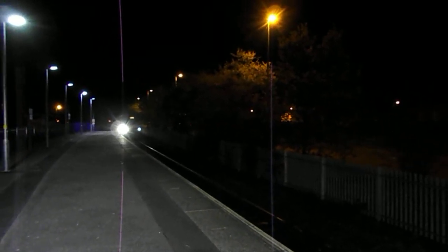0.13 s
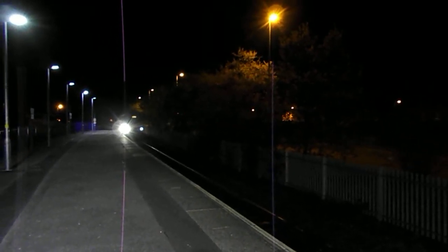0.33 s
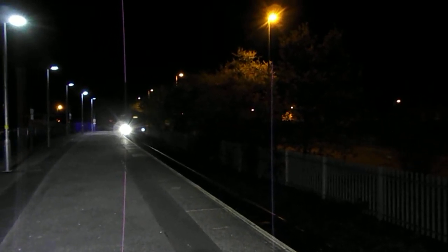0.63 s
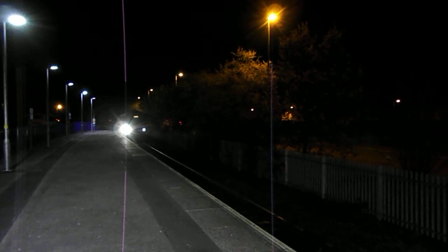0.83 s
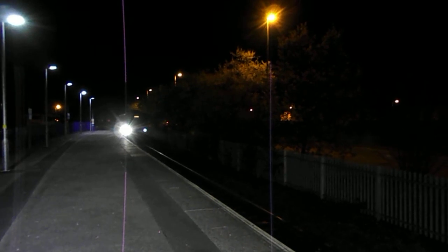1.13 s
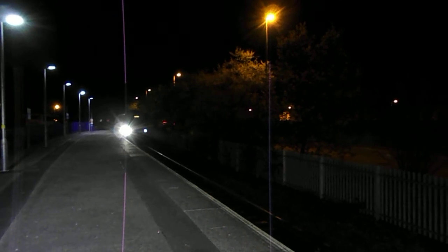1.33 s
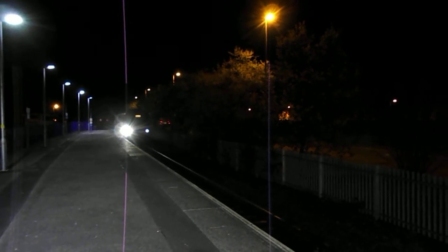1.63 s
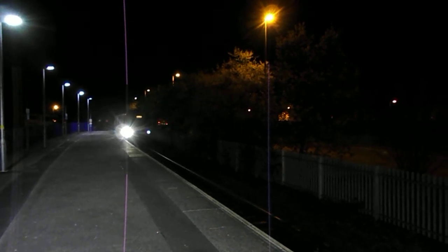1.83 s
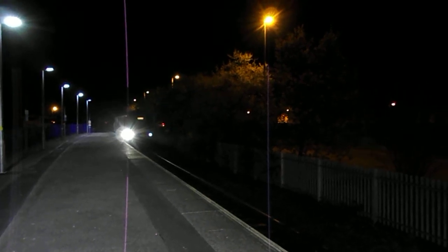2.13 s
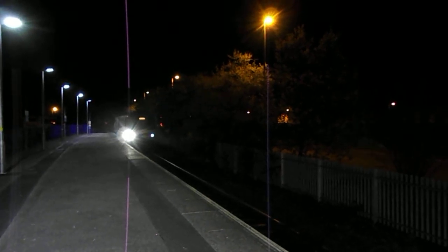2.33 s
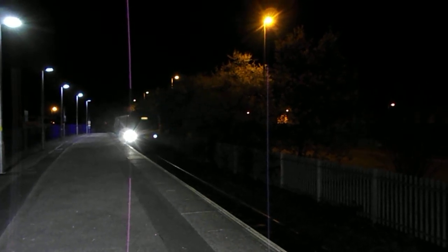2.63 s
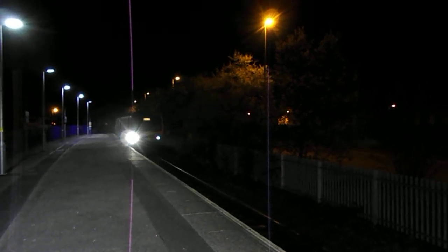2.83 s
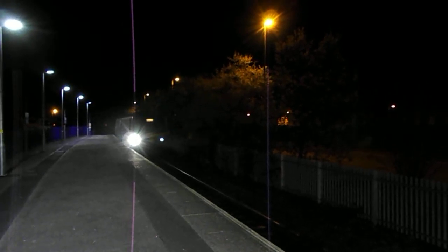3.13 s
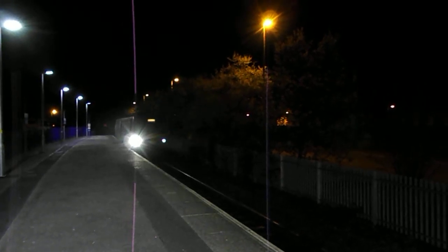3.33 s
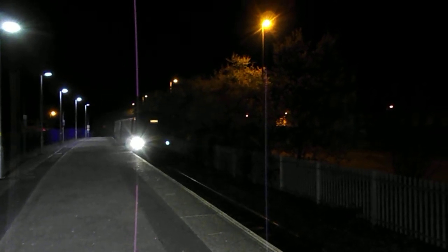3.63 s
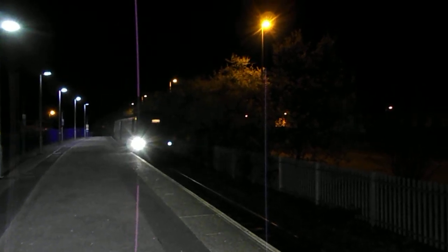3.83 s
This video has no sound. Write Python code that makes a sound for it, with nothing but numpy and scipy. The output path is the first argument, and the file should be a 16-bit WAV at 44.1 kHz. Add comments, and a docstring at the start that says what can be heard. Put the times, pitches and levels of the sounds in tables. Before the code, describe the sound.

An approaching train's brakes give a high, wavering squeal that rises out of a quiet rolling rush and eases away. Heard from an open platform, with a short wind flutter on the microphone beforehand and one click near the peak.

```python
"""A train nears a platform at night: a steady rush and hum, and rails sizzling under rolling wheels.
A brighter wash swishes twice and fades; near two seconds a gust flutters on the microphone.
Then a thin brake squeal rises, with a friction hiss and a lower moan. Two wheels sing at almost
the same pitch and beat as the squeal swells. Near its peak the camera body clicks once,
and the squeal eases away."""
import sys
import numpy as np
from scipy import signal
from scipy.fft import rfft, irfft
from scipy.io import wavfile
from scipy.ndimage import uniform_filter1d

SR = 44100
rng = np.random.default_rng(int(sys.argv[2]) if len(sys.argv) > 2 else 0)


def transcribe(u):
    """Save the signal u as a 16-bit wav file named by the first command-line argument.

    u: samples, shape (n,) or (channels, n), limited to [-1, 1]; the rate is SR.
    q: integer samples, one column per channel.
    """
    v = np.clip(np.atleast_2d(u).T, -1, 1)
    q = np.round(v * 32767).astype(np.int16)
    wavfile.write(sys.argv[1], SR, q)


N = 176400
TIME_S = np.arange(N) / SR
FREQ_HZ = np.fft.rfftfreq(N, 1 / SR)


def amp(db):
    return 10 ** (np.asarray(db) / 20)


def unit_rms(x):
    return x / np.sqrt(np.mean(abs(x) ** 2) + 1e-30)


def curve(points, column=1):
    """One column of a time table, joined by straight ramps."""
    table = np.array(points)
    return np.interp(TIME_S, table[:, 0], table[:, column])


def noise(gains):
    """Unit-level noise shaped by one gain for each of FREQ_HZ."""
    return unit_rms(irfft(rfft(rng.standard_normal(N)) * gains, N))


def coloured(spectrum, top_hz=12500):
    """Noise through an EQ curve that rolls off past both ends."""
    hz, db = np.transpose(spectrum)
    eq = amp(np.interp(np.log(FREQ_HZ + 1), np.log(hz), db))
    high_cut = 1 / (1 + (FREQ_HZ / min(hz[-1], top_hz)) ** 40)
    low_cut = np.minimum(FREQ_HZ / hz[0], 1) ** 2
    return noise(eq * high_cut * low_cut)


def ringing(peaks):
    """Unit-level noise through steep-sided resonances."""
    gains = [amp(db) / (1 + 2 * ((FREQ_HZ - hz) / width) ** 2) for hz, width, db in peaks]
    return noise(np.sqrt(sum(gain ** 2 for gain in gains)))


def band(pitch_hz, width_hz, level_db):
    """One resonant band of noise."""
    return amp(level_db) * ringing([(pitch_hz, width_hz, 0)])


def drift(rate_hz):
    """Random wander, mostly slower than rate_hz."""
    return noise(1 / (1 + (FREQ_HZ / rate_hz) ** 2))


def patchy(x, depth_db):
    """Lets patches of the spectrum swell and sink."""
    frames = signal.stft(x, nperseg=1024, noverlap=768)[2]
    patches = uniform_filter1d(rng.standard_normal(frames.shape), 9, axis=0)
    patches = unit_rms(uniform_filter1d(patches, 12, axis=1))
    return signal.istft(frames * amp(depth_db * patches), nperseg=1024, noverlap=768)[1][:N]


# Bed of train and night air: freq_hz, gain_db
RUSH_EQ = [(15, -44.5), (25, -12), (119, -6.5), (172, -8), (208, -5), (268, -6), (308, -6), (390, -11.5),
           (578, -7), (635, -11), (747, -5.5), (965, -14.5), (1110, -10.5), (1470, -12.5), (2080, -13),
           (3090, -20), (3390, -16), (4380, -23), (5270, -17.5), (6500, -32), (8450, -51), (14300, -120)]
# Colour of the brighter wash: freq_hz, gain_db
WASH_EQ = [(150, -26), (550, 0), (1250, 0.5), (1600, -1.5), (2100, 1), (2650, -11.5), (2900, -2.5),
           (3150, -12.5), (3400, -5.5), (4500, -17), (7000, -31)]
# Early fade of the wash: time_s, level_db
WASH_FADE = [(0, -42), (.35, -40.5), (.75, -43), (1.1, -47), (1.5, -51.5), (1.9, -75)]
# Two soft swishes: centre_s, width_s, level_db
SWISH_SWELLS = [(.33, 0.072, -48), (1.05, .15, -47.5)]


def rush():
    """Distant rolling noise, with a brighter wash that swishes twice and fades early."""
    bed = amp(-43) * coloured(RUSH_EQ, top_hz=6850)
    wash = amp(curve(WASH_FADE)) * coloured(WASH_EQ)
    swells = sum(amp(db) * np.exp(-.5 * ((TIME_S - s) / width) ** 2) for s, width, db in SWISH_SWELLS)
    swishes = swells * band(pitch_hz=2160, width_hz=460, level_db=0)
    return patchy(bed + wash + swishes, depth_db=1.0)


# Drone of the train: pitch_hz, width_hz, level_db
HUM_BANDS = [(114.8, 10, -56), (174.3, 11, -64.5), (206.5, 35, -54), (770, 230, -57.5), (884.5, 27, -57.5),
             (1162, 33, -63.5)]


def hum():
    """The train's low drone, over a rumble that grows as it nears."""
    drone = sum(band(*row) for row in HUM_BANDS)
    rumble = band(pitch_hz=87, width_hz=37, level_db=-60.5 + 2 * TIME_S)
    return drone + rumble


# Broad rail resonances: pitch_hz, width_hz, gain_db
SIZZLE_BANDS = [(4160, 370, -4), (5300, 750, -7), (6115, 440, -2.5), (7190, 490, 1), (8230, 260, -4),
                (9060, 360, -5.5), (9430, 130, -5.5), (10010, 140, -6.5), (10380, 910, -16)]
# Thin rail rings, set against the sizzle: pitch_hz, width_hz, relative_db
RAIL_RINGS = [(9514, 14, -16), (9607, 12, -21), (7075, 25, -15)]
# Fader ride on the rails: time_s, level_db
RAIL_FADE = [(0, -50.5), (1.1, -51.5), (1.7, -49), (2.3, -50), (3.2, -46.5), (4, -49)]


def rails():
    """Rolling wheels make the rails sizzle and ring ahead of the train."""
    rings = sum(band(*row) for row in RAIL_RINGS)
    sizzle = patchy(ringing(SIZZLE_BANDS), depth_db=0.9)
    notch_db = -19 * np.exp(-((FREQ_HZ - 7530) / 130) ** 2)  # a narrow band the rails do not carry
    sizzle = irfft(rfft(sizzle) * amp(notch_db), N)
    return amp(curve(RAIL_FADE)) * (sizzle + rings)


# Bass-heavy colour of the gust: freq_hz, gain_db
GUST_EQ = [(25, -22), (60, 6), (170, -0.5), (300, -8.5), (450, -9), (800, -55)]
# Swell of the gust: time_s, level_db
GUST_FADE = [(1.6, -59), (1.78, -44), (1.85, -55), (1.93, -34.5), (2.02, -38), (2.12, -39), (2.18, -54.5),
             (3.2, -53), (3.7, -47), (4, -55)]
# Wind thumps on the microphone: centre_s, level_db, pitch_hz
WIND_BUFFETS = [(1.798, -26, 122), (1.872, -26.5, 180), (1.904, -24, 198), (1.92, -25, 140),
                (1.928, -19, 199), (1.943, -21.5, 170), (1.978, -23.5, 159), (1.995, -20.5, 246),
                (2.012, -14, 150), (2.023, -23, 190), (2.063, -19.5, 175), (2.077, -22, 336),
                (2.08, -17, 200), (2.086, -31, 220), (2.114, -25, 189), (3.706, -32, 133)]


def wind():
    """Eddies shove the microphone in short low pulses over a rumble."""
    width_cycles, snap_db, snap_ratio = 0.56, -14, 2.43
    gust = amp(curve(GUST_FADE)) * coloured(GUST_EQ)
    for centre_s, db, hz in WIND_BUFFETS:
        for layer_db, ratio in ((0, 1), (snap_db, snap_ratio)):  # the thump and its faster edge
            cycles = (TIME_S - centre_s) * hz * ratio
            envelope = amp(db + layer_db) * np.exp(-(cycles / width_cycles) ** 2)
            gust -= envelope * np.sin(2 * np.pi * cycles)
    return gust


# Swell and release of the squeal: time_s, level_db
SQUEAL_FADE = [(0, -85), (1.2, -70), (2.0, -56.5), (2.3, -47), (2.4, -39), (2.54, -37), (2.65, -28),
               (2.78, -24.5), (2.845, -15), (2.99, -17), (3.08, -15.5), (3.18, -14.5), (3.3, -17),
               (3.41, -14), (3.47, -19.5), (3.53, -18), (3.6, -17.5), (3.65, -23), (3.72, -22),
               (3.83, -29.5), (3.9, -36.5), (4, -43)]
# Note of the first wheel: time_s, pitch_hz
FIRST_WHEEL = [(1.9, 7419), (3.1, 7416), (3.7, 7420)]
# Second wheel, set against the first: time_s, detune_hz, relative_db
SECOND_WHEEL = [(2.3, 19.6, -12), (2.72, 18.9, -10.5), (2.85, 18.7, -16), (3.0, 18.5, -8),
                (3.15, 18.3, -8.5), (3.27, 17.3, -6.5), (3.6, 16.7, -6.5), (4, 16.3, -6)]
# Weaker wheel modes, set against the first wheel: pitch_hz, width_hz, relative_db
WHEEL_MODES = [(7690, 12, -40), (8116, 20, -44), (6938, 30, -43), (7190, 45, -32), (7535, 35, -31)]
# Rasp of the slipping wheels: freq_hz, gain_db
RASP_EQ = [(3500, -44), (6000, -36.5), (6700, -25), (7000, -14), (7170, -1), (7330, 1.5), (7420, 8),
           (7530, -6.5), (7630, -16), (8200, -23), (8600, -29.5), (9400, -33), (12000, -63.5)]


def squeal():
    """Two slightly detuned wheels ring and beat; scattered echoes and rasp surround the tone."""
    level_db = curve(SQUEAL_FADE)
    first_wheel = np.exp(2j * np.pi * np.cumsum(curve(FIRST_WHEEL)) / SR)
    beats = np.cumsum(curve(SECOND_WHEEL)) / SR
    beats -= np.interp(3.27, TIME_S, beats)  # one dip of the beat lands at 3.27 s
    beating = 1 - amp(curve(SECOND_WHEEL, column=2)) * np.exp(2j * np.pi * beats)
    scatter = amp(-21) * unit_rms(drift(rate_hz=45) + 1j * drift(rate_hz=45))
    tone = np.sqrt(2) * ((beating + scatter) * first_wheel).real
    tone += sum(band(*row) for row in WHEEL_MODES)
    waver_db = drift(rate_hz=17)
    rasp = amp(-12.5 + 0.95 * level_db) * coloured(RASP_EQ)
    return amp(level_db + waver_db) * tone + rasp


# Colour of the brake hiss: freq_hz, gain_db
HISS_EQ = [(3000, -12.5), (4400, -5), (5300, -0.5), (6300, -1.5), (6800, 0.5), (7700, -6.5), (8600, -3),
           (9700, -15.5), (11000, -23)]
# Puff and sustain of the hiss: time_s, level_db
HISS_FADE = [(2.1, -75), (2.28, -61), (2.36, -47.5), (2.44, -49), (2.52, -59), (2.8, -57.5), (3.3, -50.5),
             (3.65, -48), (4, -50)]


def brake_hiss():
    """Brake friction: a puff as it bites, then a steady hiss."""
    return amp(curve(HISS_FADE)) * coloured(HISS_EQ)


# Note of the brake moan: time_s, pitch_hz
MOAN_GLIDE = [(2.2, 636), (2.85, 641), (3.1, 650), (3.4, 649), (4, 641)]
# Surges of the moan: time_s, level_db
MOAN_FADE = [(0, -56), (1.9, -60), (2.68, -58), (2.85, -43.5), (2.94, -49.5), (3.0, -46), (3.07, -54),
             (3.18, -46), (3.3, -51), (3.39, -42), (3.52, -47), (3.62, -57), (3.8, -51), (4, -57)]


def brake_moan():
    """A thin, unsteady tone that surges out of the hum as the brakes work."""
    pitch_hz = curve(MOAN_GLIDE) + 4.5 * drift(rate_hz=17.2)
    level_db = curve(MOAN_FADE) + 1.8 * drift(rate_hz=46)
    return amp(level_db) * np.sqrt(2) * np.sin(2 * np.pi * np.cumsum(pitch_hz) / SR)


def mode(start_s, pitch_hz, gain_db, t60_s, attack_s=.0003):
    """One struck vibration: a fast attack and a dying ring."""
    age_s = np.maximum(TIME_S - start_s, 0)
    envelope = np.minimum(age_s / attack_s, 1) * np.exp(-np.log(1000) * age_s / t60_s)
    return amp(gain_db) * envelope * np.sin(2 * np.pi * pitch_hz * age_s)


# Modes of the camera body: pitch_hz, gain_db, t60_s
BODY_MODES = [(1050, -14, 0.013), (2070, -4, 0.0066), (2610, 0.5, 0.011), (3120, -6, 0.0072),
              (3670, -3, 0.0046), (4830, -2.5, 0.003), (6530, 0.5, 0.0035), (8680, 4.5, 0.0041),
              (10150, -6, .006)]


def camera_click(start_s=3.3837):
    """A sharp tick rings the plastic body, its modes alternating in polarity; a low knock follows."""
    tick = sum((-1) ** k * mode(start_s, *row) for k, row in enumerate(BODY_MODES))
    knock = mode(start_s + .002, pitch_hz=604, gain_db=-16, t60_s=0.014)
    return amp(-7.5) * (tick + knock)


def scene():
    """All layers in one mono mix."""
    approach = rush() + hum() + rails()
    return (approach + wind() + squeal() + brake_hiss() + brake_moan() + camera_click())[None]


def record(dry, low_cut_hz=75, high_cut_hz=12200):
    """The microphone's bass cut and the recorder's band limit."""
    thinned = signal.lfilter(*signal.butter(1, low_cut_hz, "high", fs=SR), dry)
    band_limit = signal.firwin(255, high_cut_hz, window=("kaiser", 9), fs=SR)
    return signal.oaconvolve(thinned, band_limit[None], "same")


dry = scene()
out = record(dry)
transcribe(out)
```